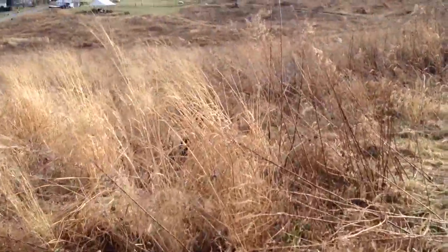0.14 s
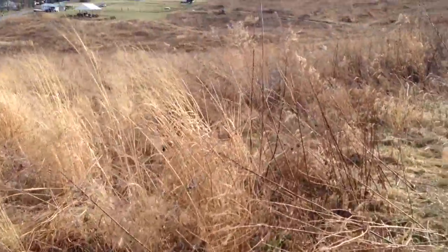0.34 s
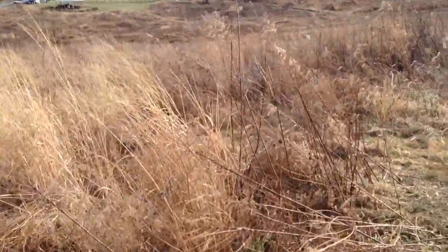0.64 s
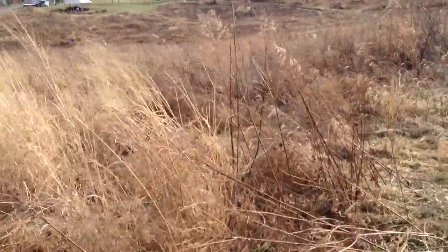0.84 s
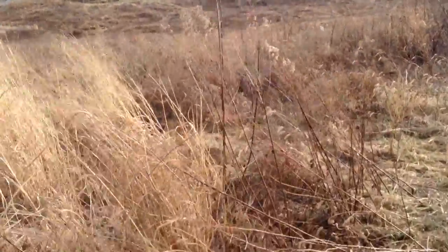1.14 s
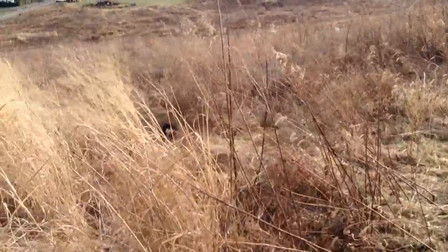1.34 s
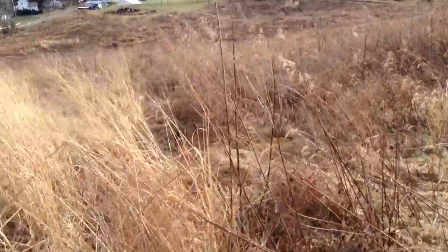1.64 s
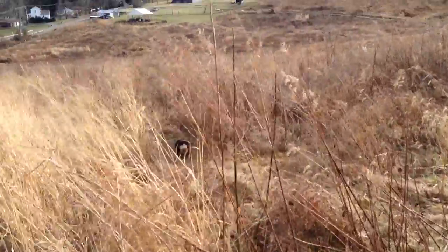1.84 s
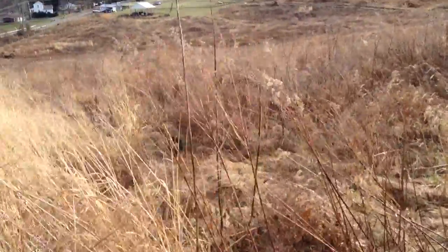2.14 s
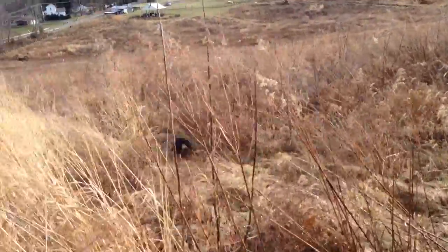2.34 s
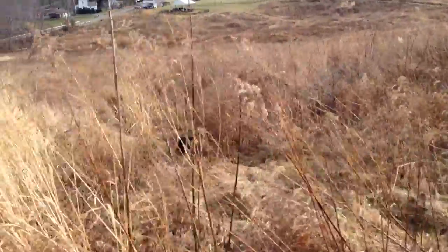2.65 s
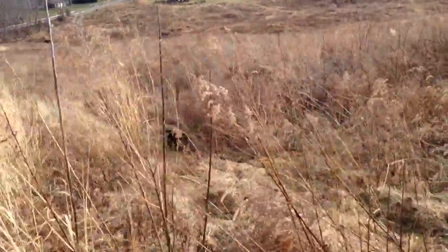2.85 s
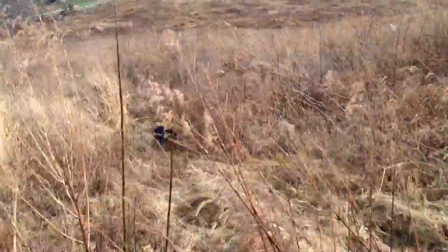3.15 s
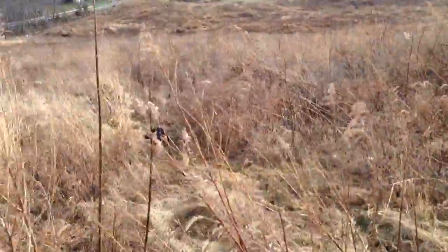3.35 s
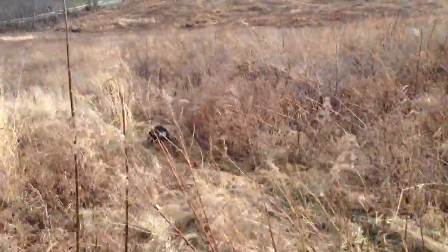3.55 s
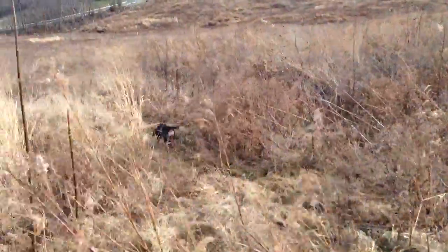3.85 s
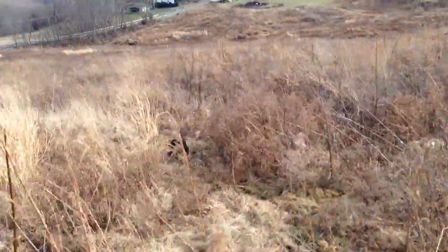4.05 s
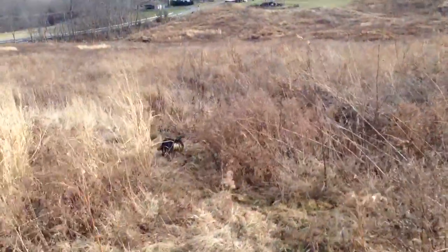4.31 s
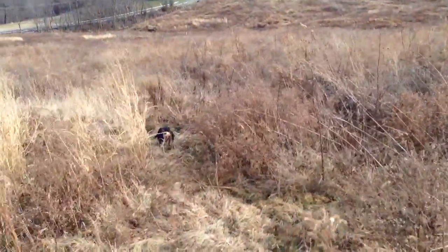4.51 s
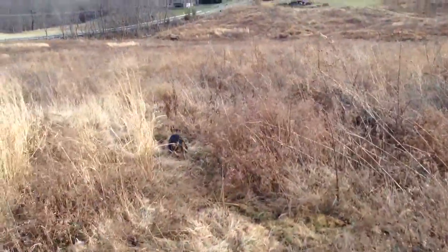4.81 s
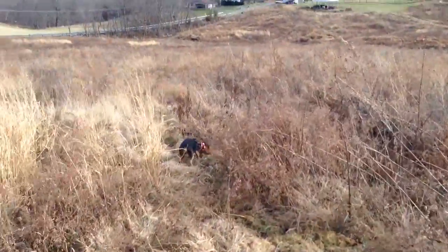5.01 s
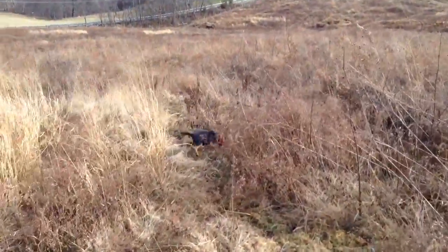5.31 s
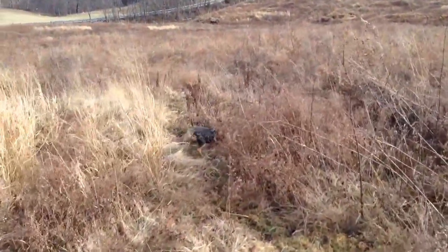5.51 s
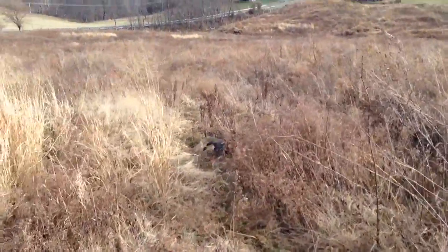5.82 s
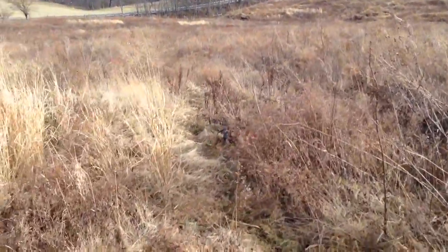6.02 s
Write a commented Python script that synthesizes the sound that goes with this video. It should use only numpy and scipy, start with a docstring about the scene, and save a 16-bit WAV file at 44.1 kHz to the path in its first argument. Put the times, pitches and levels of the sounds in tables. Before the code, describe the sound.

A hound bays three times in an open field, each call breaking from a hoarse bark into a short howl. During a pause, a strong gust rumbles on the microphone, then the dog bays six more times. A small collar bell jingles faintly on and off. Close to the microphone, someone wades through tall dry grass, with swishing blades, sharp stem snaps and a few soft footfalls.

```python
"""A hound bays nine times on a scent in a dry field, its voice breaking between hoarse rasp and clear howl as
the vocal folds pass between chaotic and periodic vibration. A small collar bell jingles in its struck modes.
Close by, someone wades through tall grass: blades swish by friction and stems snap, while the hound's paws thud
softly. Turbulent wind rumbles on the microphone, with one strong gust, over a faint hiss of air."""
import sys
import numpy as np
from scipy import signal
from scipy.fft import rfft, irfft, next_fast_len
from scipy.io import wavfile
from scipy.ndimage import uniform_filter1d

SR = 44100
rng = np.random.default_rng(int(sys.argv[2]) if len(sys.argv) > 2 else 0)


def pcm_store(signal):
    """Save signal as 16-bit PCM."""
    levels = np.round(np.clip(np.atleast_2d(signal), -1, 1) * 32767)
    wavfile.write(sys.argv[1], SR, levels.astype(np.int16).T)


N = 272097
TIME = np.arange(N) / SR


# Vocal tract response with the muzzle nearly shut: frequency_hz, gain_db
THROAT_RESPONSE = [(150, -16.5), (350, -24), (450, 3), (525, 3), (620, 4.5), (760, -1.5), (900, -1),
                   (1060, -14), (1280, -14.5), (1550, -38.5), (2600, -113)]
# Response that the open mouth adds: frequency_hz, gain_db
MOUTH_RESPONSE = [(500, -38), (750, -9), (950, 6), (1200, 5), (1560, 0), (1750, 3), (2020, -0.5),
                  (2250, -8), (2650, -15.5), (2950, -22), (3300, -34), (4500, -36)]
def hound(voice_db=-2.5, mouth_db=8.5):
    """Source and filter: the throat shapes the folds' pulses; an open mouth radiates upper partials."""
    pitch, gain, opening_db, rough = baying()
    source = vocal_folds(pitch, rough)
    throat = evened(coloured(source, THROAT_RESPONSE), window_s=.008)
    mouth = evened(coloured(source, MOUTH_RESPONSE), window_s=.008)
    return gain * from_db(voice_db) * (throat + from_db(opening_db + mouth_db) * mouth)


def vocal_folds(pitch, rough):
    """Nonlinear oscillation: driven harder, the pulses alternate strong and weak, then turn chaotic."""
    chaos = np.clip((rough - .36) / .6, 0, 1)
    doubling = np.clip(rough / .3, 0, 1) ** 2
    wander = .002 * drift(40) + .045 * chaos * drift(70)
    phase = 2 * np.pi * np.cumsum(pitch * (1 + wander)) / SR + .35 * chaos * drift(240)
    pulses = sum(np.sin(k * phase) for k in range(1, 8))
    strength = 1 + .13 * doubling * np.cos(phase / 2) + .3 * chaos * drift(200)
    # in chaos the two folds slip out of step and beat about every fifth cycle
    beat = 1 + .75 * chaos * np.cos(phase / 5 + 1.5 * drift(45))
    rasp = (.012 + .5 * chaos ** 2) * noise([(100, 0), (4000, 0)]) * (1 + .7 * np.cos(phase))
    return (pulses * strength + 2 * rasp) * beat


# The hound's calls: start_s, length_s, break_after_s, release_s, sag_s, yelp_hz, bark_hz, howl_hz,
# yelp_db, bark_db, howl_db, break_dip_db, mouth_open_db, mouth_shut_db, bark_roughness (0-1)
BAYS = [(0.338, 0.422, 0.093, 0.035, 0.074, 603, 501.4, 517.7, -19.5, -17, -21.5, 8, -16, -29, 0.79),
        (1.015, 0.280, 0.076, 0.2, 0.046, 605.5, 492.6, 524.5, -13.5, -14.5, -15.5, 7.5, -26.5, -47, 0.61),
        (1.548, 0.2, 0.14, 0.018, 0.012, 562.3, 525, 541.9, -20, -14, -19, 11.5, -25, -47, 0.84),
        (3.105, 0.420, 0.093, 0.079, 0.038, 502.6, 507.8, 513.4, -23, -14.5, -16, 12.5, -16.5, -41, 0.73),
        (3.797, 0.21, 0.084, 0.091, 0.039, 605.6, 492.8, 534.3, -18, -16, -15, 12.5, -15.5, -41, 0.86),
        (4.18, 0.21, 0.092, 0.048, 0.027, 537.5, 494.3, 498, -21.5, -18.5, -20, 7.5, -15.5, -40, 0.83),
        (4.598, 0.180, 0.1, 0.03, 0.02005, 476.6, 508.6, 532, -28.5, -18, -20.5, -5, -18.5, -29, 0.85),
        (5.07, 0.190, 0.0961, 0.051, 0.036, 556.5, 514, 525, -20.5, -13.5, -14.5, 6, -19, -36, 0.8),
        (5.559, 0.2, 0.13, 0.089, 0.047, 471.6, 516, 506, -27.5, -16, -15.5, -3, -16, -27.5, 0.7)]
# Steadier spans of the folds: start_s, end_s, roughness (0 clear, 0.3 period doubled, 1 chaotic)
STEADY_SPANS = [(0.496, 0.697, 0.03), (0.717, 0.753, 0.3), (1.178, 1.21, 0.44), (1.683, 1.724, 0.18),
                (3.253, 3.466, 0.1), (3.821, 3.857, 0.076), (4.219, 4.31, 0.4), (4.721, 4.752, 0.24),
                (5.112, 5.148, 0.46), (5.59, 5.643, 0.52), (5.686, 5.733, 0.76)]
# Two howls drawn out into held notes, one curve each: time_s, pitch_hz, level_db
HELD_NOTES = [
    [(0.51, 519.6, -20.5), (0.568, 529.2, -16), (0.634, 500, -20), (0.69, 511, -27.5)],
    [(3.275, 505, -21), (3.293, 506.3, -20), (3.315, 525.3, -24), (3.349, 532.3, -14.5),
     (3.403, 507.6, -19), (3.46, 533.7, -18)],
]
def baying(lock_s=.015, held_blend_s=.03115, held_db=.5):
    """Phonation over all the bays: at times the folds lock into a steadier tone or hold a note."""
    controls = np.zeros((4, N))
    controls[0] = 500   # pitch between bays, Hz
    for start_s, length_s, *shape in BAYS:
        during = (TIME >= start_s) & (TIME < start_s + length_s)
        controls[:, during] = bay(TIME[during] - start_s, length_s, *shape)
    pitch, gain, opening_db, rough = controls
    for start_s, end_s, steady_rough in STEADY_SPANS:
        locked = ramp(TIME, start_s - lock_s / 2, lock_s) - ramp(TIME, end_s - lock_s / 2, lock_s)
        rough = blend(rough, steady_rough, locked)
    for note in HELD_NOTES:
        note_hz, note_db = in_time(note)
        start_s, end_s = note[0][0], note[-1][0]
        held = ramp(TIME, start_s - held_blend_s, held_blend_s) - ramp(TIME, end_s, held_blend_s)
        pitch = blend(pitch, note_hz, held)
        gain = blend(gain, from_db(note_db + held_db), held)
    return pitch, gain, opening_db, rough


def bay(t, length_s, break_s, release_s, sag_s, yelp_hz, bark_hz, howl_hz,
        yelp_db, bark_db, howl_db, dip_db, open_db, shut_db, bark_rough, howl_rough=.9):
    """Register break: a yelp and open-mouthed bark flip to a hoarse howl that sags as air runs out."""
    yelp_s, half_break_s = .017, .0055
    sag_hz_per_s, sag_db_per_s = 3000, 124
    barking = ramp(t, yelp_s, .008)
    howling = ramp(t, break_s - half_break_s, 2 * half_break_s)
    in_bark_s = np.maximum(t - yelp_s, 0)
    in_sag_s = np.maximum(t - length_s + sag_s, 0)
    closing = ramp(t, .51 * break_s, .03)
    jaw_open = ramp(t, 0, .022) ** 2 * (1 - closing)

    scoop_hz = bark_hz * (1 - .12 * np.exp(-in_bark_s / .016))   # the bark starts flat and slides up
    droop = 1 - .025 * closing * (1 - howling)   # pitch gives way as the mouth closes
    pitch = blend(blend(yelp_hz, scoop_hz, barking), howl_hz, howling) * droop
    pitch -= sag_hz_per_s * in_sag_s

    swelling_db = bark_db - 7.5 * np.exp(-in_bark_s / .023)
    level_db = blend(blend(yelp_db, swelling_db, barking), howl_db, howling)
    level_db -= dip_db * np.exp(-((t - break_s) / half_break_s) ** 2)
    level_db -= sag_db_per_s * in_sag_s
    gain = from_db(level_db) * ramp(t, 0, .014) * ramp(length_s - t, 0, release_s)
    return pitch, gain, blend(shut_db, open_db, jaw_open), blend(bark_rough, howl_rough, howling)


def field(x, echo_db=-32.5, t60=0.66):
    """Diffuse scattering: brush and slopes return a faint, short tail."""
    tail = rng.standard_normal(SR // 2) * from_db(-60 * TIME[:SR // 2] / t60)
    return x + from_db(echo_db) * signal.fftconvolve(x, tail / np.linalg.norm(tail))[:N]


# Strikes of the clapper: start_s, level_db, brightness_db
CLAPPER_HITS = [(0.1716, -56, -4), (0.346, -50.5, 7.5), (0.397, -44.5, -5), (0.619, -49.5, -7),
                (0.733, -47, -6), (0.826, -52.5, -7), (0.9, -46, -24), (0.9309, -44.5, 0), (1, -44, -3.5),
                (1.15, -46.5, -6), (1.2441, -50, -3.5), (1.4195, -60, 7), (2.396, -53, -11),
                (2.589, -58, 6), (2.8105, -51.5, 3.5), (3.058, -52.5, 2), (3.152, -52, 6),
                (3.4985, -49.5, -3.5), (3.708, -56.5, 11), (3.8624, -43.5, -11), (4.4349, -48, -4.5),
                (4.4902, -51, -6), (4.7593, -58, 6.5), (4.956, -51, -13), (5.24, -60.5, 7),
                (5.3463, -55, 8.5)]
# Natural modes of the bell: frequency_hz, level_db, t60_s
BELL_MODES = [(2902, -5.5, .3), (2925, -7, .17), (6165, -11, .14), (7328, -3.5, .17), (9570, -6, .14),
              (10820, -11, .1), (12460, -10, .12)]
def collar_bell(bell_db=6.5, upper_above_hz=4000):
    """Modal vibration: each strike rings every mode, the upper ones with strengths of its own."""
    start_s, level_db, bright_db = np.transpose(CLAPPER_HITS)
    out = np.zeros(N)
    for hz, mode_db, t60 in BELL_MODES:
        upper_db = bright_db - 2 + 4.5 * rng.standard_normal(len(start_s))
        hit_db = level_db + mode_db + (hz > upper_above_hz) * upper_db
        out += ring(clicks(start_s, from_db(hit_db)), hz, t60)
    return from_db(bell_db) * out


# One swish for each stride: crest_s, rise_s, hold_s, fall_s, level_db, extra_treble_db
STRIDES = [(0.0, 0.1, 0.05, 0.11, -51, 3), (0.598, 0.32, 0.061, 1, -49.5, 4),
           (1.578, 0.054, 0.081, 0.44, -38.5, 1.5), (2.27, 0.19, 0.008, 0.45, -38, 3),
           (3.166, 0.38, 0.16, 0.13, -43, 2), (3.864, 0.29, 0.29, 0.19, -43, 6),
           (4.929, 0.51, 0.034, 0.5, -45, 2), (5.506, 0.058, 0.034, 0.26, -39, 4),
           (5.983, 0.29, 0.052, 0.23, -45, 4.5)]
# Spectrum of rubbing blades: frequency_hz, density_db
GRASS_SPECTRUM = [(530, -11), (900, -5), (2450, -2.5), (2720, -2.5), (5510, 2), (9930, -6), (15000, -8)]
def grass(swish_db=-3.0, rustle_db=-60, ticks_per_s=1500, tick_spread_db=3.5):
    """Friction noise: blades rub in a hiss full of tiny ticks, swelling at each stride, some crisper."""
    rustle_power = from_db(rustle_db) ** 2
    swishes = [swell(*stride[:5]) for stride in STRIDES]
    crisp_swishes = [power * from_db(stride[-1]) ** 2 for power, stride in zip(swishes, STRIDES)]
    body_gain = np.sqrt(rustle_power + sum(swishes))
    treble_gain = np.sqrt(rustle_power + sum(crisp_swishes))
    heights = from_db(tick_spread_db * np.minimum(rng.exponential(1, N), 4.2))
    ticks = rms_one(random_clicks(heights, ticks_per_s))
    rub = rms_one(coloured(ticks + rng.standard_normal(N), GRASS_SPECTRUM))
    treble = coloured(rub, [(9000, -20), (13000, 0), (16000, 0)])
    return from_db(swish_db) * (body_gain * (rub - treble + crackles()) + treble_gain * treble)


def crackles(rate_per_s=16, height_db=16, spread_db=3.5):
    """A Poisson process: single dry blades give way in sparse, sharp ticks."""
    heights = from_db(height_db + spread_db * np.minimum(rng.exponential(1, N), 3))
    return coloured(random_clicks(heights, rate_per_s), GRASS_SPECTRUM)


# Dry stems breaking: start_s, level_db, pitch_hz
STEM_BREAKS = [(0.2097, -23, 4700), (0.2625, -35.5, 7320), (0.3203, -40, 1630), (1.8684, -30.5, 1900),
               (2.3192, -21.5, 4340), (2.474, -34, 6540), (2.6754, -27.5, 2570), (3.3109, -28, 3960),
               (3.4188, -32, 1570), (4.1422, -16.5, 4650), (4.7032, -24.5, 1560), (5.2946, -36, 4950),
               (5.5479, -20, 14900), (5.6959, -27, 6790), (5.7317, -28.5, 3830), (5.7742, -31.5, 2330)]
def snaps(snap_db=0.5, stem_db=-5, stem_t60=0.006, crack_t60=0.0073, splinter_t60=0.073,
          thick_hz=4000, thin_hz=10000):
    """Brittle fracture: a stem cracks, rings and splinters; thick ones sound woody, thin ones sharp."""
    start_s, level_db, pitch_hz = np.transpose(STEM_BREAKS)
    thin = np.clip((pitch_hz - thick_hz) / (thin_hz - thick_hz), 0, 1)
    woody = noise([(300, 0.5), (1000, -32.5), (1800, 1), (2800, -6), (4500, -2.5), (7000, -4.5),
                   (15000, -12)])
    sharp = noise([(1500, -11), (5000, 1.5), (9000, 3), (12000, -1), (15000, -41.0)])
    splinters = from_db(-20 + 5 * drift(300))
    out = sum(ring(clicks([at], from_db(db + stem_db)), hz, stem_t60) for at, db, hz in STEM_BREAKS)
    for share, colour in ((1 - thin, woody), (thin, sharp)):
        breaks = clicks(start_s, np.sqrt(share) * from_db(level_db + snap_db))
        out += colour * (fading(breaks, crack_t60) + splinters * fading(breaks, splinter_t60))
    return out


# Soft steps of the hound's paws on matted grass: start_s, level_db
FOOTFALLS = [(0.873, -50.5), (3.61, -44), (3.673, -42.5), (4.429, -40), (4.561, -51.5)]
def footfalls(thud_db=2.5):
    """Damped impact: matted grass is pressed down with a dull, short puff."""
    start_s, level_db = np.transpose(FOOTFALLS)
    envelope = fading(clicks(start_s, from_db(level_db + thud_db)), t60=0.11)
    return envelope * noise([(150, -7), (400, 5), (1200, -13.5)])


# Gusts on the microphone: crest_s, rise_s, hold_s, fall_s, level_db
GUSTS = [(0.739, 0.032, 0.0085, 0.042, -36), (0.865, 0.046, 0.0095, 0.083, -41.5),
         (1.105, 0.1, 0.028, 0.34, -45), (1.58, 0.27, 0.25, 0.059, -43.5),
         (1.929, 0.043, 0.0078, 0.13, -37.5), (2.18, 0.62, 0.078, 0.18, -47),
         (2.56, 0.28, 0.059, 0.28, -31), (2.565, 0.0066, 0.0065, 0.014, -21),
         (2.71, 0.087, 0.094, 0.12, -20.5), (2.848, 0.01, 0.028, 0.06, -29.5),
         (3.089, 0.091, 0.21, 0.34, -44.5), (4.08, 0.48, 0.22, 1.08, -57.5),
         (5.24, 0.058, 0.01, 0.079, -42.5), (5.428, 0.057, 0.03, 0.16, -47),
         (5.577, 0.046, 0.19, 0.19, -44), (5.954, 0.081, 0.067, 0.48, -42)]
# Pressure spectra of light and of strong wind: frequency_hz, density_db
BREEZE_SPECTRUM = [(21, -46), (35, -6), (52, 0), (85, 0.5), (146, -5), (188, -7.5), (700, -24.5),
                   (910, -40), (1540, -120)]
GUST_SPECTRUM = [(35, -46), (60, -30), (232, 2.5), (351, -6), (398, -2.5), (674, -12.5), (1200, -42.5),
                 (1560, -69), (2640, -120)]
def wind(wind_db=-0.5, lull_db=-63.5, gust_onset_db=-35.5, gust_span_db=17.0, gust_db=-1.5):
    """Turbulence: eddies buffet the microphone; stronger wind sheds smaller ones, higher in pitch."""
    level_db = 10 * np.log10(from_db(lull_db) ** 2 + sum(swell(*row) for row in GUSTS))
    force = np.clip((level_db - gust_onset_db) / gust_span_db, 0, 1)
    breeze = evened(noise(BREEZE_SPECTRUM), window_s=.04) * from_db(4 * drift(16))
    gust = evened(noise(GUST_SPECTRUM), window_s=.02) * from_db(3.5 * drift(35))
    return from_db(level_db + wind_db) * ((1 - force) * breeze + from_db(gust_db) * force * gust)


# Spectrum of the still air: frequency_hz, density_db
AIR_SPECTRUM = [(210, 2), (350, 1), (2660, -5.5), (2880, -7), (7390, -14.5), (15000, -21.5)]
def still_air(level_db=-58.5):
    """Ambient noise floor: a faint, steady, broadband hiss."""
    return from_db(level_db) * noise(AIR_SPECTRUM)


def from_db(db):
    """Decibels to amplitude ratio."""
    return 10 ** (np.asarray(db) / 20)


def rms_one(x):
    """Normalisation to unit power."""
    return x / np.sqrt(np.mean(x ** 2) + 1e-20)


def evened(x, window_s):
    """Gain control: short-term power is held at 1."""
    size = max(int(window_s * SR), 2)
    power = uniform_filter1d(uniform_filter1d(x ** 2, size), size)
    return x / np.sqrt(np.abs(power) + 1e-12)


def coloured(x, spectrum):
    """Spectral shaping by (frequency_hz, gain_db) points, falling 20 dB an octave beyond the ends."""
    hz, db = np.transpose(spectrum)
    size = next_fast_len(N + 4096)
    octave = np.log2(np.maximum(np.arange(size // 2 + 1) * SR / size, 1))
    beyond = np.abs(octave - np.clip(octave, np.log2(hz[0]), np.log2(hz[-1])))
    response = from_db(np.interp(octave, np.log2(hz), db) - 20 * beyond)
    return irfft(rfft(x, size) * response, size)[:N]


def noise(spectrum):
    """Filtered Gaussian noise of unit power."""
    return rms_one(coloured(rng.standard_normal(N), spectrum))


def drift(rate_hz):
    """Random modulation: low-passed noise of unit power."""
    lowpass = signal.butter(2, rate_hz, fs=SR, output="sos")
    return rms_one(signal.sosfilt(lowpass, rng.standard_normal(N + SR))[SR:])


def clicks(times, heights):
    """Impulse excitation, one sample each."""
    out = np.zeros(N)
    out[np.round(np.asarray(times) * SR).astype(int)] = heights
    return out + 1e-18


def random_clicks(heights, rate_per_s):
    """Shot noise: impulses of random sign at random times."""
    return heights * rng.choice([-1, 1], N) * (rng.random(N) < rate_per_s / SR)


def ring(x, hz, t60):
    """Damped resonator: a unit impulse starts a decaying sine of height 1."""
    radius, angle = from_db(-60 / (t60 * SR)), 2 * np.pi * hz / SR
    return signal.lfilter([0, np.sin(angle)], [1, -2 * radius * np.cos(angle), radius * radius], x)


def fading(x, t60):
    """Exponential decay after each impulse."""
    return signal.lfilter([1], [1, -from_db(-60 / (t60 * SR))], x)


def swell(crest_s, rise_s, hold_s, fall_s, db):
    """Power envelope, linear in decibels: 20 dB up in rise_s, a hold, 20 dB down in fall_s."""
    away = np.maximum(crest_s - TIME, 0) / rise_s + np.maximum(TIME - crest_s - hold_s, 0) / fall_s
    return from_db(db - 20 * np.minimum(away, 10)) ** 2


def ramp(t, start_s, length_s):
    """Linear rise from 0 to 1."""
    return np.clip((t - start_s) / max(length_s, 1e-4), 0, 1)


def blend(a, b, share):
    """Linear crossfade from a to b."""
    return a + (b - a) * share


def in_time(rows):
    """Linear interpolation of a curve's columns at every sample."""
    time_s, *columns = np.transpose(rows)
    return [np.interp(TIME, time_s, column) for column in columns]


def scene():
    """Superposition: the dog out in the field; grass, wind and still air near by."""
    near = grass() + snaps() + footfalls() + wind() + still_air()
    return (field(hound()) + collar_bell() + near)[None]


def record(dry, bass_cut_hz=42, treble_cut_hz=15500):
    """Band limiting: the small microphone loses the deep bass, and the top is cut steeply."""
    highpass = signal.butter(2, bass_cut_hz, "high", fs=SR, output="sos")
    lowpass = signal.ellip(10, .2, 70, treble_cut_hz, fs=SR, output="sos")
    return signal.sosfilt(lowpass, signal.sosfilt(highpass, dry))


dry = scene()
out = record(dry)
pcm_store(out)
```